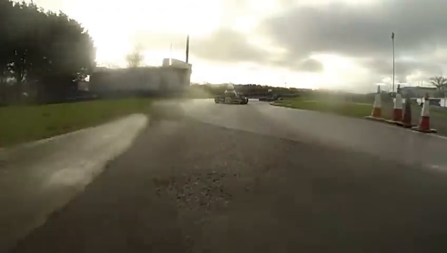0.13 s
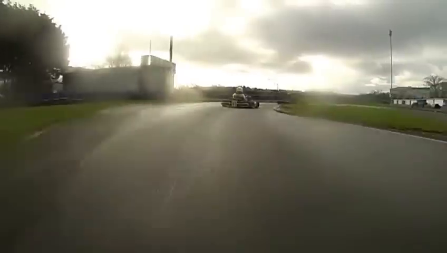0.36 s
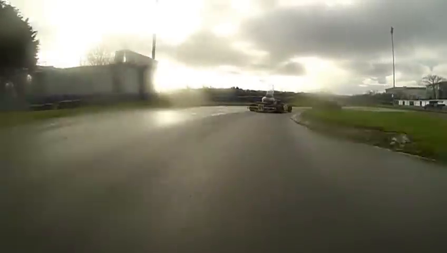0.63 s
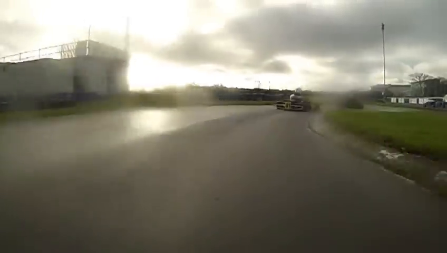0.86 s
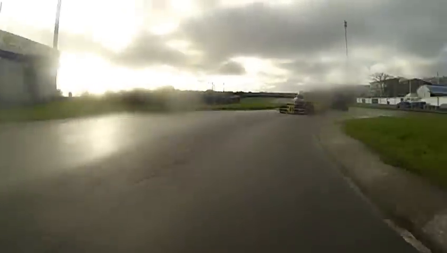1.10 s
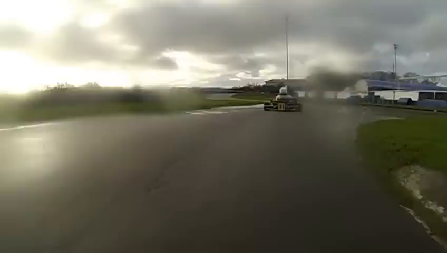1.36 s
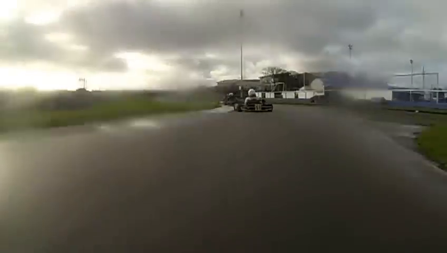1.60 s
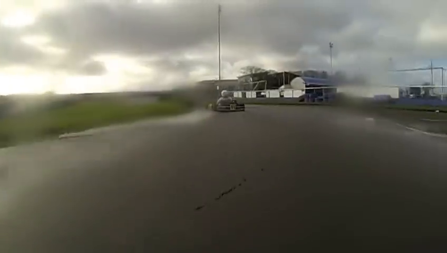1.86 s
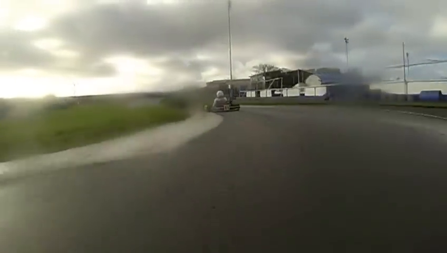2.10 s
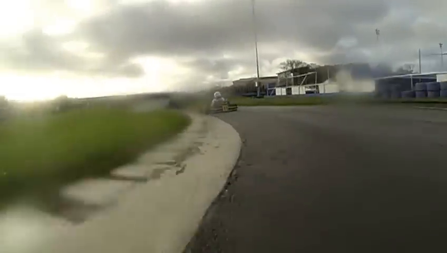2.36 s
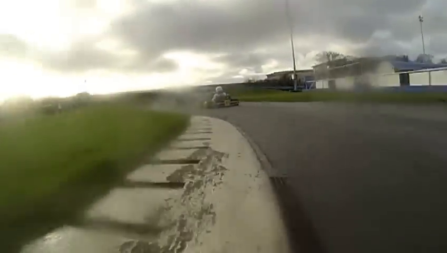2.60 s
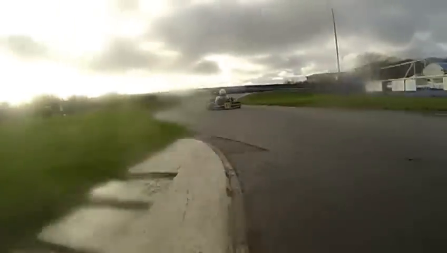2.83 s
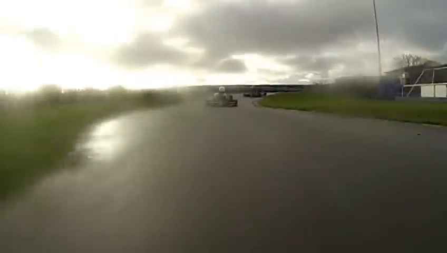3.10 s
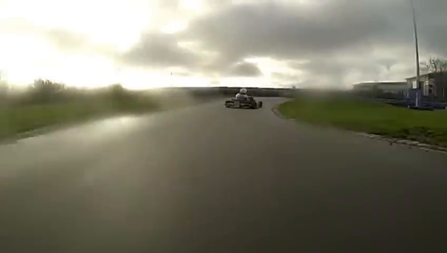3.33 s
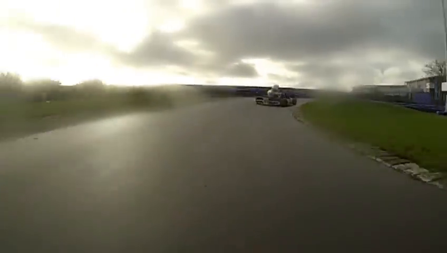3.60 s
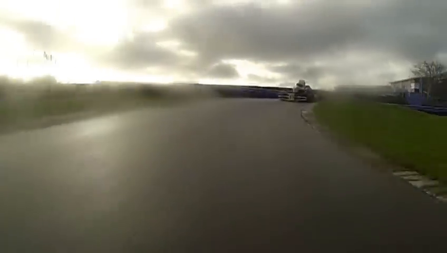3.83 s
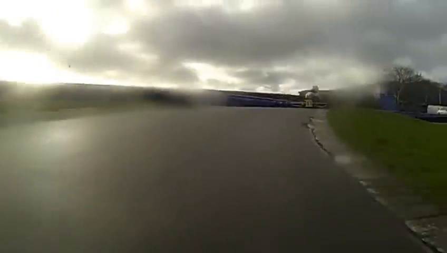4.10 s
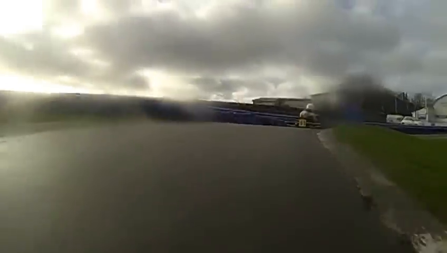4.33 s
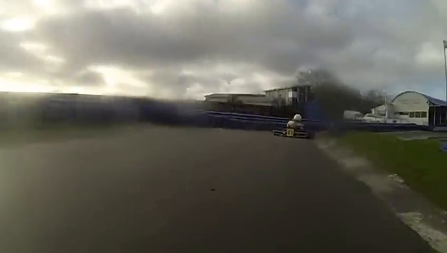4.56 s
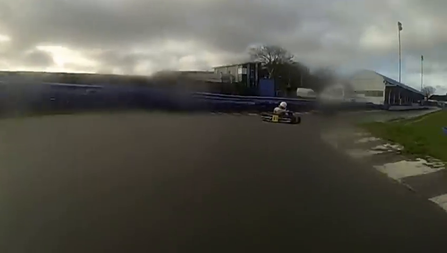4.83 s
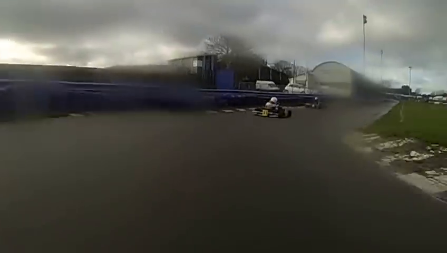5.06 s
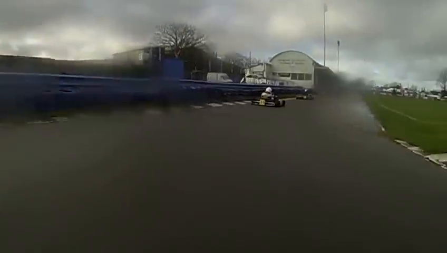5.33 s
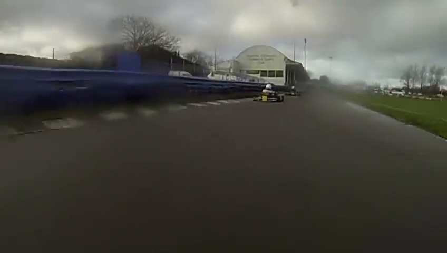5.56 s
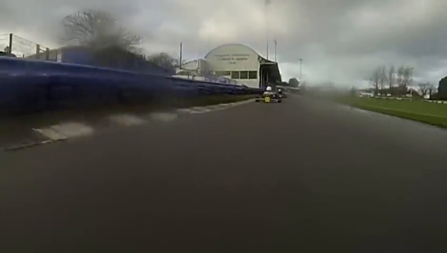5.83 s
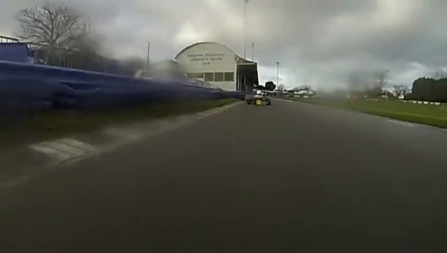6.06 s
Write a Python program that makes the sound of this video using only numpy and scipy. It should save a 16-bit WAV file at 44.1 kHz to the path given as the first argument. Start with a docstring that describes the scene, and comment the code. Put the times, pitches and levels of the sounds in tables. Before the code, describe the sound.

The microphone is boxed in on a kart, so everything is close, boomy and slightly crushed. Deep random shuddering runs throughout, with a low engine drone and a hollow, raspy midrange roar flickering above it. From 0 to 1 s the engine pitch falls quickly, then sags; until 2 s it stays low and uneven, with small bursts and faint spray ticks. It begins climbing around 2.1 s. A heavy jolt hits at 2.37 s, then from about 2.6 to 3.2 s a ribbed kerb makes a fast, pounding flutter with clustered knocks, muffling the engine. Around 3.4-3.7 s the engine pulls clean and loud, with a thin chain whine. At 4.3 s hard jolts and a crack land as the pitch drops, duller until 4.8 s. It then climbs again, with a bright grit tick at 5.4 s, a knock at 5.47 s, and stronger roar and returning whine at 6 s.

```python
"""A deep shudder and an engine drone fill the microphone in a sealed case on a single-cylinder kart.
Random shaking and a swaying bend mode make the shudder; sines at the engine orders make the drone.
Firings and gas hiss ring the air of the case as a flickering roar, now and then with a chain whine.
Spray, faint taps, knocks and grit are short bursts of noise; a ribbed kerb adds a fast, heavy shake.
The microphone flattens the largest swings, so the loud shaking mutes the finer sounds."""
import sys
import numpy as np
from scipy import signal
from scipy.fft import rfft, irfft
from scipy.io import wavfile
from scipy.ndimage import uniform_filter1d

SR = 44100
rng = np.random.default_rng(int(sys.argv[2]) if len(sys.argv) > 2 else 0)


def put_to_file(sound):
    """Save the sound as 16-bit audio at rate SR, in the file named by the first command-line argument."""
    columns = np.atleast_2d(sound).T  # one column per channel
    safe = np.clip(columns, -1, 1)
    whole_steps = np.round(safe * 32767)
    wavfile.write(sys.argv[1], SR, whole_steps.astype(np.int16))


def amplitude_ratio(level_db):
    """Convert a level in decibels to the matching linear amplitude (field) ratio."""
    exponent = np.asarray(level_db, float) / 20
    return 10 ** exponent


N = 272979
T = np.arange(N) / SR  # time of each sample in seconds

# Engine speed. Each row: time in seconds, firing rate in Hz (one firing a turn).
ENGINE_SPEED = [(0, 126), (.125, 121.7), (.25, 110.4), (.6, 100), (.75, 96.7), (.95, 93.5), (1.03, 90.5),
                (1.08, 92), (1.25, 92.2), (1.4, 92.4), (1.5, 90.7), (1.6, 93), (1.67, 97.5), (1.76, 95),
                (1.92, 92), (2.0, 91.7), (2.17, 95.5), (2.35, 100.5), (2.6, 103.4), (2.8, 101.8),
                (3.05, 107), (3.25, 114.5), (3.374, 113.6), (3.55, 117.8), (3.7, 121.8), (4.0, 120.2),
                (4.125, 114), (4.25, 111.6), (4.5, 97.5), (4.75, 96), (4.9, 103), (5.125, 107.8),
                (5.375, 109), (5.5, 112.5), (5.7, 110), (5.875, 111.3), (6.12, 117.4), (6.19, 117.2)]
# How cleanly the engine pulls. Each row: time in seconds, share of sharp, even firings from 0 to 1.
CLEAN_PULL = [(0, .4), (.15, .2), (.3, .15), (.9, .3), (1.6, .35), (1.75, .65), (2.3, .7), (2.42, .05),
              (3.25, .05), (3.4, .8), (3.72, .85), (3.8, .35), (4.25, .4), (4.35, .03), (5.0, .1),
              (5.15, .6), (5.6, .6), (5.7, .35), (5.85, .55), (6.0, .5), (6.1, .7), (6.19, .7)]
# Shudder of the frame. Each row: time in seconds, relative level in dB.
SHUDDER_LEVEL = [(0, -17.5), (.45, -17), (.8, -17.5), (1.2, -13), (1.5, -16.5), (2.03, -20), (2.12, -19.5),
                 (2.38, -16.5), (2.8, -20), (3.2, -16.5), (3.4, -23.5), (3.65, -11), (3.95, -20),
                 (4.3, -14.5), (4.6, -22), (4.9, -16.5), (5.16, -21), (5.64, -17), (6.19, -21)]
# Bending mode of the frame. Each row: time in seconds, centre pitch in Hz.
BENDING_PITCH = [(0, 53.76), (.38, 52.07), (.55, 67.15), (.72, 70.51), (.83, 58.44), (1.2, 66.18),
                 (1.6, 69.24), (1.83, 61.5), (2.0, 74.16), (2.3, 66), (3.2, 61.9), (3.36, 47), (3.69, 46.9),
                 (3.82, 58.54), (4.05, 69.04), (4.4, 64.22), (4.56, 50.5), (4.9, 66), (5.6, 60.87),
                 (5.84, 46.2), (6.19, 41.3)]
# Tone of the road shake in the frame. Each row: frequency in Hz, relative level in dB.
ROAD_TONE = [(8, -17), (20, -16), (35, 2), (60, 0), (90, -7.5), (130, -32), (300, -58.5)]
# Hard jolts that set the frame swinging. Each row: start in seconds, direction as 1 or -1,
# level in dB before the mount limits it, pitch in Hz.
FRAME_JOLTS = [(2.371, 1, -1, 78), (4.2725, 1, -4, 62), (4.297, -1, -4, 62), (4.359, -1, -4, 68)]
# Duller thuds. Each row: time in seconds, middle level in dB.
THUD_LEVEL = [(0, -26), (.17, -26.5), (.27, -44), (.85, -34), (1.4, -30.5), (2.2, -35), (2.38, -38),
              (2.5, -36), (2.75, -32), (3.3, -39.5), (3.6, -33.5), (4.3, -28), (4.55, -41.5), (4.85, -31),
              (5.1, -36.5), (5.8, -30.5), (6.19, -32.5)]
# Tone of the thuds. Each row: frequency in Hz, relative level in dB.
THUD_TONE = [(70, -34), (110, -7), (150, -7), (220, -19), (300, -33.5), (600, -36), (1200, -73)]
# Tone of the rattling case. Each row: frequency in Hz, relative level in dB.
RATTLE_TONE = [(200, -6), (500, 0), (1500, 0), (2500, -10), (5000, -24), (10000, -36), (16000, -52)]
# How hard the engine shakes the frame. Each row: time in seconds, first order in dB, higher orders in dB.
ENGINE_SHAKE = [(0, -33, -28), (.25, -55, -37.5), (.6, -26.5, -34.5), (.75, -37, -34), (.91, -32, -23.5),
                (1.02, -17.5, -35), (1.07, -24, -20), (1.15, -27, -25.5), (1.4, -38, -33),
                (1.5, -24.5, -26), (1.6, -18, -27.5), (1.69, -27.5, -28), (1.76, -12.5, -24),
                (1.8, -28.5, -29), (1.88, -24, -24), (2.0, -15.5, -25.5), (2.1, -21, -30.5),
                (2.17, -17.5, -29), (2.25, -29, -23.5), (2.36, -30, -27), (2.5, -27, -36), (2.9, -46, -41),
                (3.25, -42.5, -42.5), (3.5, -23.5, -24), (3.75, -25, -34.5), (4.2, -26.5, -23),
                (4.45, -30, -40), (4.75, -24, -31), (5.0, -34.5, -30.5), (5.2, -16.5, -20.5),
                (5.4, -25.5, -28), (5.52, -36.5, -19), (5.7, -37, -34.5), (6.19, -26, -21.5)]
# Balance of the first to sixth engine orders. Each entry: relative level in dB.
ORDER_BALANCE = [0, -12, -23, -25.5, -26, -28]
# How well the frame carries each pitch to the case. Each row: frequency in Hz, gain in dB.
FRAME_CARRY = [(90, 1), (105, 0), (125, 0), (185, 10), (205, 1.5), (220, 0.5), (245, -10), (290, 0),
               (330, 1), (362, 7.5), (385, 1), (420, -7.5), (500, -8), (750, -8)]
# Airborne roar. Each row: time in seconds, level of its middle range in dB, level of its treble in dB.
ROAR_LEVEL = [(0.0, -36, -56), (0.01, -25.5, -51), (0.1, -31.5, -43), (0.12, -21.5, -54),
              (0.17, -34.5, -44), (0.19, -36.5, -57), (0.29, -39, -59.5), (0.62, -31, -50.5),
              (0.69, -37, -52.5), (0.74, -27, -49), (0.77, -36, -54), (0.86, -33.5, -47), (0.98, -37, -53),
              (1.12, -32, -48), (1.34, -40, -57), (1.57, -40, -52), (1.6, -34.5, -49.5),
              (2.02, -30.5, -50.5), (2.03, -36, -51.5), (2.31, -25.5, -45), (2.38, -28.5, -47.5),
              (2.39, -42.5, -58.5), (2.46, -33.5, -54), (2.69, -43, -57), (2.71, -36, -58),
              (2.74, -47.5, -65), (3.0, -38, -61), (3.07, -31, -57.5), (3.1, -42.5, -60),
              (3.15, -36.5, -57), (3.29, -37, -57), (3.57, -19, -43.5), (3.6, -24.5, -47),
              (3.71, -27.5, -44), (3.76, -37.5, -48.5), (3.83, -27.5, -46.5), (3.89, -37.5, -51),
              (4.0, -27.5, -46), (4.03, -33, -46.5), (4.26, -28.5, -47.5), (4.28, -38, -50),
              (4.52, -44.5, -74.5), (4.53, -43, -64.5), (4.83, -33.5, -45), (4.91, -36.5, -53),
              (5.02, -33, -48.5), (5.03, -42, -52.5), (5.17, -27, -45.5), (5.22, -29.5, -43),
              (5.34, -30.5, -46.5), (5.57, -25.5, -43.5), (5.67, -36, -50.5), (5.79, -23.5, -47),
              (5.86, -33, -52.5), (5.93, -27.5, -47), (5.96, -31.5, -50.5), (6.09, -21, -41),
              (6.12, -28.5, -45.5), (6.17, -19.5, -44.5), (6.19, -27, -46)]
# Sudden bursts of the roar. Each row: start in seconds, boost in dB.
ROAR_BURSTS = [(.12, 6), (.357, 7), (.73, 7), (1.017, 7), (1.311, 7), (1.419, 7), (2.164, 7), (2.519, 7),
               (3.105, 6), (3.144, 7), (3.94, 7), (4.07, 7), (4.672, 6), (5.753, 6), (5.873, 6), (5.996, 5),
               (6.038, 8)]
# Resonances of the air and walls of the case. Each row: centre in Hz, rough width in Hz, relative level in dB.
CASE_MODES = [(355.7, 76, -5.5), (910.5, 75, -11.5), (1020, 120, -15.5), (1229, 90, -4), (1327, 150, -6),
              (1408, 94, 3), (1537, 310, -8.5), (1794, 207, -14.5), (2286, 110, -17), (2562, 345, -23.5),
              (3684, 200, -28), (5070, 530, -38.5), (6320, 240, -49), (7630, 670, -47)]
# What leaks through between those resonances. Each row: frequency in Hz, relative level in dB.
CASE_LEAK = [(120, -31), (250, -15), (500, -22.5), (720, -26), (2000, -32.5), (3400, -31), (4300, -45.5),
             (6000, -55.5), (10000, -59), (13500, -62), (16000, -77)]
# Lower edge of the roar, near 900 Hz. Each row: time in seconds, relative level in dB.
ROAR_EDGE = [(0, 2), (.5, 0.5), (1.2, 2), (1.6, 6.5), (2.3, 6.5), (2.8, -3), (3.2, 5), (3.55, 1),
             (4.2, 2.5), (4.8, 0.5), (5.5, 2.5), (6.19, 0)]
# Parts of the roar that swell and fade alone. Each entry: centre in Hz.
WANDER_CENTRES = [935, 1060, 1220, 1350, 1500, 1500, 1760]
# Whine of the chain. Each row: time in seconds, middle level in dB.
CHAIN_WHINE = [(0, -40), (.2, -60), (3.3, -60), (3.37, -34), (3.47, -27), (3.57, -21), (3.63, -24),
               (3.72, -25), (3.75, -55), (5.98, -55), (6.06, -24), (6.19, -23)]
# Larger drops of spray that spit on the case. Each row: start in seconds, level in dB.
SPRAY_SPITS = [(0.1236, -45.5), (0.2214, -53.5), (0.238, -47), (0.3253, -60), (0.3511, -55), (0.447, -49.5),
               (0.4544, -58.5), (0.6114, -54), (0.624, -50), (0.643, -48.5), (0.8619, -49), (0.951, -46.5),
               (1.1724, -48.5), (1.3244, -48.5), (1.3416, -51), (1.4099, -51), (1.4426, -47.5),
               (1.4965, -48.5), (1.714, -45), (1.7624, -51), (1.8765, -48.5), (2.0165, -47.5),
               (2.4433, -55), (2.478, -51.5), (2.52, -49.5), (2.6, -50), (2.6172, -51), (2.6793, -52),
               (3.6317, -46), (3.6558, -44), (3.8197, -51), (3.8975, -49), (3.9758, -42.5), (4.6432, -51),
               (4.7186, -51), (5.4564, -40.5), (5.8274, -47)]
# Knocks on the case. Each row: start in seconds, length in seconds,
# then the levels of body, crack and thump in dB.
CASE_KNOCKS = [(.174, .004, -34, -47, -26), (.221, .003, -48, -53, -45), (.237, .003, -48, -52, -45),
               (2.367, .011, -30, -42, -20), (2.384, .004, -36, -56, -40), (2.62, .008, -36, -54, -28),
               (2.645, .01, -32, -51, -22), (2.663, .008, -35, -62, -28), (2.695, .008, -31, -62, -17),
               (2.702, .018, -30, -58, -26), (2.722, .014, -31, -59, -22), (2.742, .008, -33, -55, -22),
               (2.757, .01, -33, -56, -28), (2.772, .008, -36, -59, -23), (2.788, .01, -35, -57, -28),
               (2.81, .01, -35, -60, -27), (2.823, .008, -35, -60, -30), (2.846, .008, -31, -50, -27),
               (2.872, .006, -35, -54, -25), (2.9, .006, -37, -59, -28), (2.929, .006, -35, -55, -25),
               (2.99, .006, -36, -58, -24), (4.2985, .004, -26, -33, -28), (4.3615, .008, -37, -45, -30),
               (4.43, .007, -36, -58, -25), (4.4475, .006, -31, -62, -18), (4.478, .003, -42, -54, -28),
               (5.4715, .004, -27, -43, -34)]
# Grit that spits or pings on the case. Each row: start in seconds, centre in Hz, width in Hz, level in dB.
GRIT_HITS = [(3.7718, 6500, 488.6, -35), (5.396, 9160, 9400, -31)]
# Shake from the kerb. Each row: time in seconds, level in dB of its once-a-rib tone.
KERB_LEVEL = [(2.585, -20.5), (2.63, -9.5), (2.76, -5), (2.9, -10.5), (2.96, -16), (3.08, -14), (3.12, -20),
              (3.18, -20.5), (3.26, -15)]
# Ribs under the wheels. Each row: time in seconds (kerb() plays it 1.9 ms early), ribs passed.
KERB_RIBS = [(2.585, 0), (2.65, 2), (2.745, 5), (2.905, 10), (2.96, 12), (3.019, 14), (3.088, 16),
             (3.146, 18), (3.18, 19), (3.261, 22)]

SPIT_S = .0011  # time scale of a drop or tap in seconds


def unit(x):
    """Scale to rms 1."""
    return x / np.sqrt(np.mean(np.abs(x) ** 2))


def curves(table):
    """Columns of a table joined by straight lines in time."""
    s, *columns = np.transpose(table)
    return [np.interp(T, s, c) for c in columns]


def walk(rate):
    """Random levels held 1 / rate seconds and smoothed twice; rms about 1."""
    hold = max(int(SR / rate), 2)
    steps = np.repeat(rng.standard_normal(N // hold + 1), hold)
    return unit(uniform_filter1d(uniform_filter1d(steps, hold), hold)[:N])


def fading(s, decay_s):
    """Jumps to 1 at time s and dies away."""
    return (T >= s) * np.exp(-np.maximum(T - s, 0) / decay_s)


def band(x, lo_hz, hi_hz):
    """Gentle band-pass without delay."""
    sos = signal.butter(1, [lo_hz, hi_hz], "band", fs=SR, output="sos")
    return signal.sosfiltfilt(sos, x, padtype="even")


def colour(x, points, modes=()):
    """Causal filter whose power is a smooth spectrum plus steep resonances."""
    size = 16384
    f = np.arange(size // 2 + 1) * SR / size + 1
    hz, db = np.transpose(points)
    smooth_db = np.interp(np.log(f), np.log(hz), db, left=db[0] - 20, right=db[-1] - 40)
    power = amplitude_ratio(2 * smooth_db)
    for mode_hz, width, mode_db in modes:
        power = power + amplitude_ratio(2 * mode_db) / (1 + ((f - mode_hz) / width * 1.46) ** 2) ** 2
    # folding the cepstrum forward makes the filter answer as early as it can
    cepstrum = irfft(np.log(power) / 2)
    cepstrum[1:size // 2] *= 2
    cepstrum[size // 2 + 1:] = 0
    return signal.fftconvolve(x, irfft(np.exp(rfft(cepstrum))))[:N]


def firings(cycles, scatter_db):
    """One click at each whole cycle, shared between two samples, each of its own size."""
    count = np.arange(1, int(cycles[-1]))
    at = np.interp(count, cycles, np.arange(N))
    size = amplitude_ratio(scatter_db * rng.standard_normal(N // 200)[:len(at)])
    i = at.astype(int)
    early = np.bincount(i, size * (1 - at + i), N + 1)[:N]
    late = np.bincount(i + 1, size * (at - i), N + 1)[:N]
    return early + late


def frame():
    """Road noise shakes the frame broadly and rings its bending mode, which moves in pitch."""
    swing = walk(14) + 1j * walk(14) + 0.91
    turning = np.exp(2j * np.pi * np.cumsum(curves(BENDING_PITCH)[0]) / SR)
    mode = unit(np.real(swing * turning))
    shake = unit(colour(rng.standard_normal(N), ROAD_TONE))
    thud = unit(colour(rng.standard_normal(N) * amplitude_ratio(2 * walk(30)), THUD_TONE))
    shudder = amplitude_ratio(curves(SHUDDER_LEVEL)[0] + 3.5 * walk(9)) * (0.9 * mode + 1.76 * shake)
    # a jolt takes over the swing until it has rung out
    for s, way, db, hz in FRAME_JOLTS:
        ring = fading(s - .003, decay_s=0.028)
        ring = uniform_filter1d(uniform_filter1d(ring, size=150), size=150)
        jolt = np.sign(way) * amplitude_ratio(db) * np.sin(2 * np.pi * hz * (T - s))
        shudder = shudder * (1 - ring) + ring * jolt
    # the mount allows the case only so much swing
    travel = .6
    reach = np.abs(signal.hilbert(np.pad(shudder, (0, SR // 10), "reflect"))[:N]) / travel
    limited = shudder / (1 + reach ** 4) ** .25
    return limited + amplitude_ratio(curves(THUD_LEVEL)[0] + 3.5 * walk(11)) * thud


def rattle(shake):
    """The case chatters in its mount whenever the frame jerks fast, more on the way down."""
    jerk = signal.sosfilt(signal.butter(1, [60, 250], "band", fs=SR, output="sos"), shake)
    force = np.abs(jerk) * np.where(jerk < 0, 1.2, 1)
    # the play in the mount is small, so harder jerks add little
    loose = np.tanh(np.maximum(force - .17, 0) / 0.13)
    chatter = colour(loose * amplitude_ratio(2.8 * walk(400)) * rng.standard_normal(N), RATTLE_TONE)
    return amplitude_ratio(-32.0) * band(chatter, 1600, 12000)


def drone(cycles, hz):
    """The lowest engine orders shake the frame as nearly pure tones that waver and break up."""
    carry_hz, carry_db = np.transpose(FRAME_CARRY)
    first_db, higher_db = curves(ENGINE_SHAKE)
    total = np.zeros(N)
    for order, balance_db in enumerate(ORDER_BALANCE, 1):
        load_db = first_db if order == 1 else higher_db
        path_db = np.interp(np.log(order * hz), np.log(carry_hz), carry_db)
        waver_db = 1.2 * walk(7) + 1.8 * walk(20)
        phase = 2 * np.pi * order * cycles + .12 * (order + 1) * walk(20)
        total += np.sqrt(2) * amplitude_ratio(load_db + balance_db + path_db + waver_db) * np.sin(phase)
    return total


def wander(x):
    """The resonances of the case swell and fade alone as the mount flexes."""
    spectrum, f = rfft(x), np.arange(N // 2 + 1) * SR / N
    edge_db, = curves(ROAR_EDGE)
    steady = 1 - .6 * curves(CLEAN_PULL)[0]  # a clean pull wanders less
    total = np.zeros(N)
    for hz, weight in zip(WANDER_CENTRES, np.eye(len(WANDER_CENTRES))):
        part = irfft(spectrum * np.interp(f, WANDER_CENTRES, weight), N)
        swell_db = steady * 2.6 * walk(11)
        total += amplitude_ratio(swell_db + (edge_db if hz < 1100 else 0)) * part
    return unit(total)


def roar(cycles):
    """Firings and the gas that puffs after each one ring the case; the whole flickers and bursts out."""
    burst_db = np.zeros(N)
    for s, db in ROAR_BURSTS:
        dip_before = np.exp(-((T - s) / 0.0088) ** 2) * (T < s) / 2
        burst_db += db * (fading(s, decay_s=0.01) - dip_before)
    share = np.clip(curves(CLEAN_PULL)[0], 0, 1)
    flicker_db = .8 * (1 - curves(CLEAN_PULL)[0]) * walk(14)
    # bursts lift the treble less than the middle
    levels_db = curves(ROAR_LEVEL) + flicker_db + np.outer([1, .3], burst_db)
    level_db, treble_db = uniform_filter1d(levels_db, size=130)
    # the low roar follows the treble less than one to one
    low_db = -42.5 + 0.87 * (treble_db + 50.0) + 1.0 * walk(9)
    puff = 1.6 + np.exp(-(cycles % 1) / .3)
    gas = unit(puff * amplitude_ratio(1.2 * walk(90)) * rng.standard_normal(N))
    # the silencer draws each firing out into a short falling sweep
    lag = np.arange(int(.008 * SR)) / SR
    sweep = signal.chirp(lag, 2600, lag[-1], 400) * np.hanning(len(lag)) ** .3
    swept = band(signal.fftconvolve(firings(cycles, scatter_db=2.4), sweep)[:N], 750, 2100)
    # the firings stand out of the gas only in the middle of the range
    middle_gas = band(gas, 750, 2100)
    drive = gas - (1 - np.sqrt(1 - share)) * middle_gas
    drive = drive + np.sqrt(share) * np.std(middle_gas) * unit(swept)
    sound = colour(drive * amplitude_ratio(1.2 * walk(22)), CASE_LEAK, CASE_MODES)
    high_pass = signal.butter(3, 2600, "high", fs=SR, output="sos")
    low_pass = signal.butter(3, 750, "low", fs=SR, output="sos")
    treble = signal.sosfiltfilt(high_pass, sound, padtype="even")
    low = signal.sosfiltfilt(low_pass, sound, padtype="even")
    middle = amplitude_ratio(level_db) * wander(sound - treble - low)
    return amplitude_ratio(low_db) * unit(low) + middle + amplitude_ratio(treble_db + 0.9 * walk(15)) * unit(treble)


def whine(cycles):
    """The chain on the drive sprocket sings one slightly unsteady tone, one wave for each tooth."""
    teeth = 12  # waves a turn
    level_db = curves(CHAIN_WHINE)[0] + 1.5 * walk(25)
    phase = 2 * np.pi * teeth * cycles + .25 * walk(30)
    return np.sqrt(2) * amplitude_ratio(level_db) * np.sin(phase)


def spray():
    """Each drop from the wet road is one thin, bright tick; most are small and fall at random."""
    drops_per_s, smallest_db, spread_db = 60, -67, 2.5  # the many finer drops
    s, db = np.transpose(SPRAY_SPITS)
    chance = rng.random((600, 2))
    fine_s = np.cumsum(-np.log(1 - chance[:, 0])) / drops_per_s
    fine_db = smallest_db - spread_db * np.log(1 - chance[:, 1])
    s, db = np.r_[s, fine_s], np.r_[db, fine_db]
    inside = s < T[-1]
    drops = np.bincount((s[inside] * SR).astype(int), amplitude_ratio(db[inside]), N)
    shape = signal.fftconvolve(drops, np.exp(-(T[:200] / SPIT_S) ** 2))[:N]
    hiss = band(band(rng.standard_normal(N), 4000, 10000), 4000, 10000)
    return shape * unit(hiss)


def tap(cycles):
    """A loose part taps faintly once a turn, each tap a tiny burst of bright noise."""
    taps = firings(cycles, scatter_db=5)
    shape = signal.fftconvolve(taps, np.exp(-(T[:200] / SPIT_S) ** 2))[:N]
    hiss = band(band(rng.standard_normal(N), 6000, 10000), 6000, 10000)
    return amplitude_ratio(-63) * shape * unit(hiss)


def narrow(x, edges_hz, times):
    """Band-pass several times over, each time scaled to rms 1."""
    for _ in range(times):
        x = unit(signal.sosfilt(signal.butter(1, edges_hz, "band", fs=SR, output="sos"), x))
    return x


def ticks():
    """A knock rings the hollow case, cracks through its wall and thumps the mount; grit spits."""
    out, size = np.zeros(N), 800
    lag = np.arange(size) / SR
    thump = np.exp(-lag / .004) * np.sin(2 * np.pi * 220 * lag)
    knock_noise = rng.standard_normal((len(CASE_KNOCKS), 2, size))
    for (s, length, body_db, crack_db, thump_db), noise in zip(CASE_KNOCKS, knock_noise):
        shape = np.minimum(lag / .001, 1) * np.exp(-(2 * lag / length) ** 2)
        body = amplitude_ratio(body_db) * narrow(noise[0], (350, 2200), times=4)
        crack = amplitude_ratio(crack_db) * narrow(noise[1], (1800, 5500), times=2)
        out[int(s * SR):][:size] += shape * (body + crack) + amplitude_ratio(thump_db) * thump
    grit_noise = rng.standard_normal((len(GRIT_HITS), size))
    for (s, hz, width, db), noise in zip(GRIT_HITS, grit_noise):
        hiss = narrow(noise, [hz - width / 2, hz + width / 2], times=2)
        out[int(s * SR):][:size] += amplitude_ratio(db) * np.exp(-lag / 0.00053) * hiss
    return out


def kerb():
    """Each rib drops the frame sharply; it rises again more slowly to the next."""
    s, count = np.transpose(KERB_RIBS)
    turn = 2 * np.pi * np.interp(T + 0.0019, s, count)
    # falling harmonics lean the wave towards a sawtooth
    drop = np.sin(turn) + .45 * np.sin(2 * turn) + .2 * np.sin(3 * turn) + .07 * np.sin(4 * turn)
    return -np.sqrt(2) * amplitude_ratio(curves(KERB_LEVEL)[0]) * drop


def scene():
    """Everything arrives at one microphone inside the case."""
    hz, = curves(ENGINE_SPEED)
    unsteady = 1 + .002 * walk(40) + .003 * walk(8)
    cycles = np.cumsum(hz * unsteady) / SR  # firings so far
    shake = frame() + kerb()
    shaking = shake + rattle(shake)
    engine = drone(cycles, hz) + roar(cycles) + whine(cycles)
    small_sounds = ticks() + spray() + tap(cycles)
    return (shaking + engine + small_sounds)[None]


def top_cut(x):
    """Nothing passes above the cut-off."""
    return signal.sosfilt(signal.butter(12, 15700, fs=SR, output="sos"), x)


def record(dry):
    """The microphone flattens its largest swings, muting what rides on them; the input then sheds the bass."""
    top = np.where(dry > 0, .68, .58)  # upward swings reach a little further
    knee = 5  # higher bends more sharply
    flat = dry / (1 + (np.abs(dry) / top) ** knee) ** (1 / knee)
    thin = signal.sosfilt(signal.butter(1, 58, "high", fs=SR, output="sos"), flat)
    thin = signal.sosfilt(signal.butter(1, 12, "high", fs=SR, output="sos"), thin)
    return top_cut(thin)


dry = scene()
out = record(dry)
put_to_file(out)
```